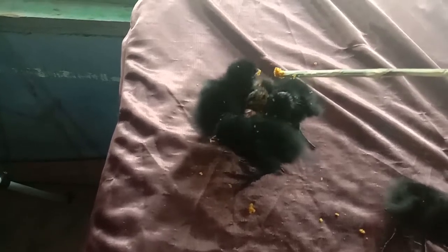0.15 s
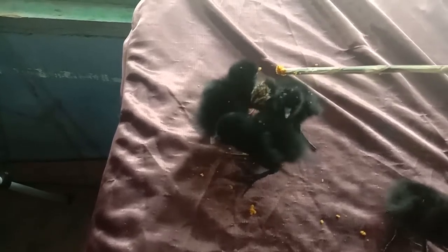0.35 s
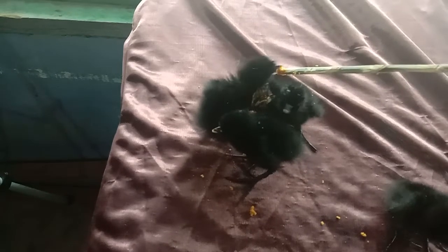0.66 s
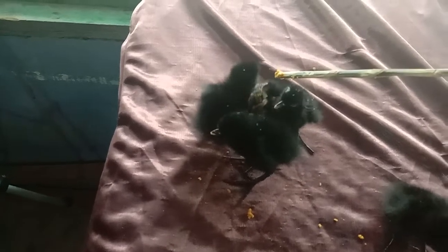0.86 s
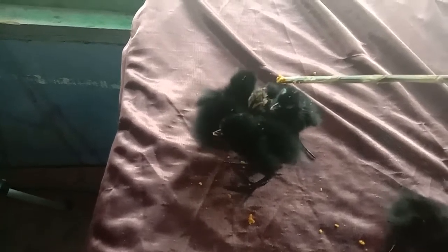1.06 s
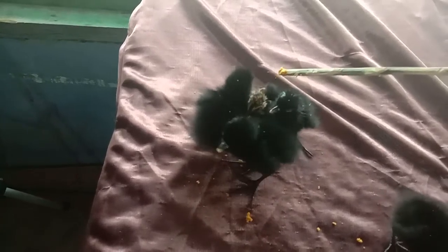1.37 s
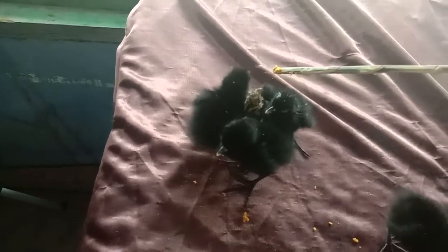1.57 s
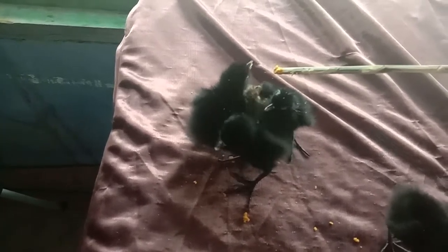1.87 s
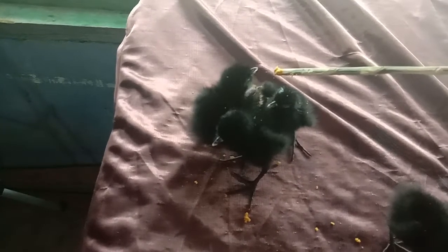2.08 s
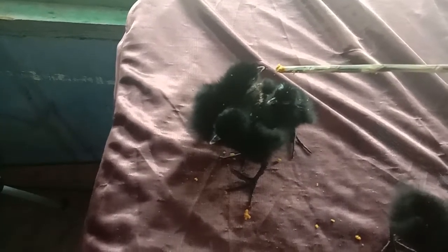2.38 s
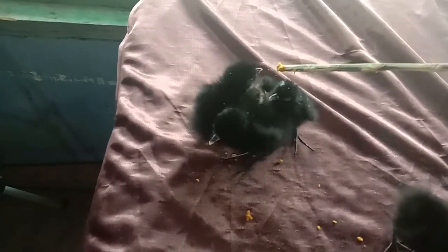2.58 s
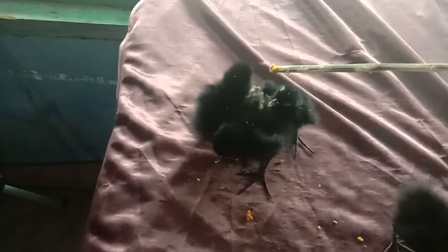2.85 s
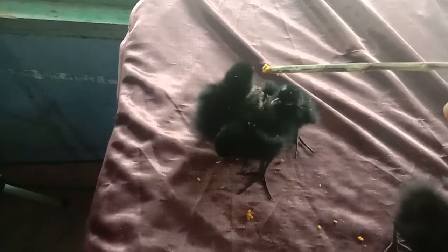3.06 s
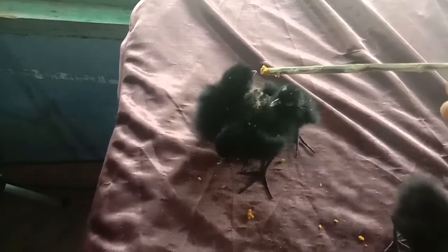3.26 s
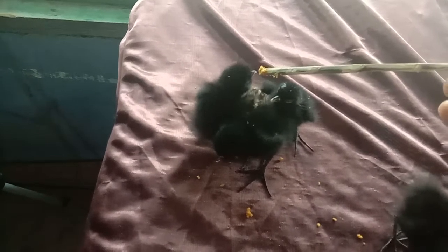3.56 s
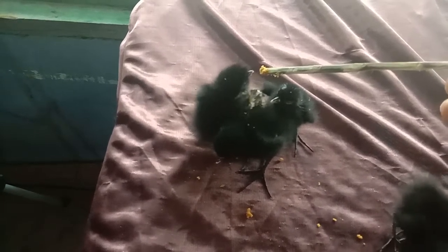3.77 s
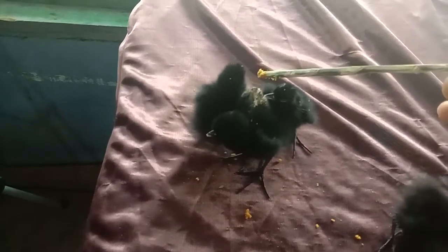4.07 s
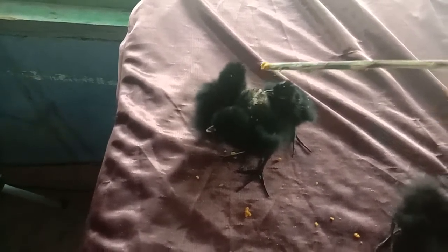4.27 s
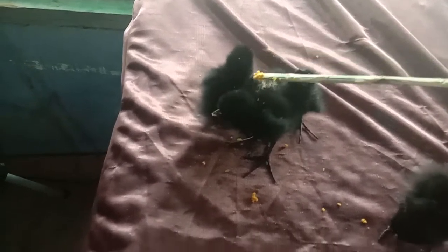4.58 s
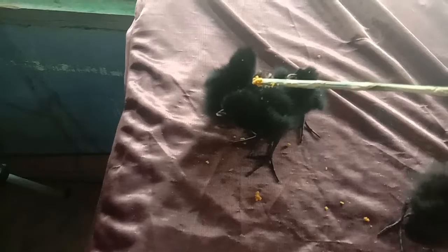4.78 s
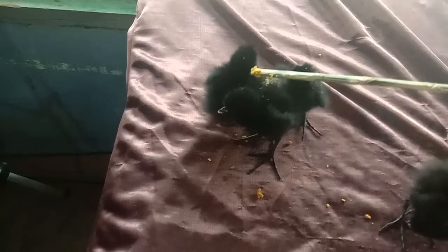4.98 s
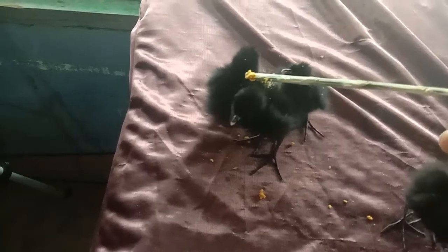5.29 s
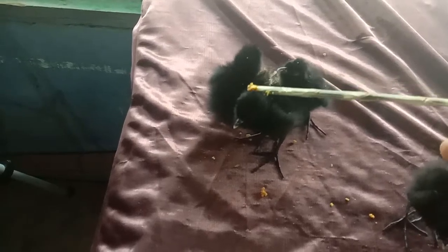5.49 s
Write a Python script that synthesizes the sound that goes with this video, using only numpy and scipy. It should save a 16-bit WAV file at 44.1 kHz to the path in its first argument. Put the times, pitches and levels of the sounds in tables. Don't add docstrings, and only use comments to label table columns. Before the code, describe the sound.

In a small shed, one hatchling near a phone cheeps piercingly, opening mid-peep, pausing, then calling again singly and in clusters until a loud last peep. Distant chicks flicker faintly, cloth rustles lightly, and a neighbouring machine throbs and rattles unevenly. One soft dove coo and a brief low rumble appear late, amid watery, noise-reduced hiss.

```python
import sys
import numpy as np
from scipy import signal
from scipy.io import wavfile
from scipy.ndimage import uniform_filter1d

SR = 44100
rng = np.random.default_rng(int(sys.argv[2]) if len(sys.argv) > 2 else 0)


def to_wav(sig):
    pcm = np.clip(np.atleast_2d(sig), -1, 1) * 32767
    pcm = np.round(pcm).astype(np.int16)
    wavfile.write(sys.argv[1], SR, pcm.T)


def makeup_ratio(level_db):
    decades = np.asarray(level_db, float) / 20
    return 10 ** decades


N = 248724


def svf(x, hz, width):
    return signal.lfilter(*signal.iirpeak(hz, hz / width, SR), x)


def narrow_noise(hz, width):
    return svf(svf(rng.standard_normal(N), hz, width), hz, width)


def unit(x):
    return x / np.sqrt(np.mean(x ** 2))


def walk(rate):
    k = int(SR / rate)
    levels = np.clip(rng.standard_normal(N // k + 1), -2.2, 1.6)
    held = np.repeat(levels, k)
    return 1.4 * uniform_filter1d(uniform_filter1d(held, k), k)[:N]


def span(table, fade=.006):
    s, *columns = np.transpose(table)
    i = np.arange(max(int(s[0] * SR), 0), min(int(s[-1] * SR), N))
    from_start = i - i[0] + (i[0] == 0) * N
    to_end = i[-1] - i + (i[-1] >= N - 2) * N
    ends = np.clip(np.minimum(from_start, to_end) / (fade * SR), 0, 1)
    smooth = (uniform_filter1d(np.interp(i / SR, s, c), size=130, mode="nearest") for c in columns)
    return i, ends * np.sqrt(2), *smooth


def hiss():
    # (frequency [Hz], level [dB per Hz])
    colour = [(18, -48), (30, -43), (95, 0.5), (392, -16.5), (735, -20), (955, -74), (1240, -7), (1610, -9),
              (1790, -16.5), (2460, -14.5), (3640, -10.5), (4370, -20.5), (9110, -21.5), (15800, -71)]
    hz_points, db_points = np.transpose(colour)
    out = 0
    for hz in 35 * 2 ** np.arange(0, 8.9, 1 / 3):
        db = np.interp(np.log(hz), np.log(hz_points), db_points) + 2.0 * walk(19)
        out = out + makeup_ratio(db) * narrow_noise(hz, hz / 3)
    out = out / np.sqrt(np.mean(svf(out, 8830, 733) ** 2))
    return out + makeup_ratio(7) * unit(narrow_noise(19000, 2200))


def rumble():
    start_s, rise_s, hold_s, fall_s = 4.98, 0.11, 0.14, 0.28
    turns = start_s + np.cumsum([0, rise_s, hold_s, fall_s])
    shape = np.interp(np.arange(N) / SR, turns, [0, 1, 1, 0])
    floor = sum(makeup_ratio(db) * unit(narrow_noise(hz, width))
                for db, hz, width in ((-46, 137.4, 18), (-49.5, 222, 65)))
    return shape * floor


def housing():
    # (frequency [Hz], width [Hz], level [dB])
    panels = [(96.6, 12.4, -1), (601.4, 100, -1), (680.5, 34, -1.5), (751.5, 10.2, 0), (875, 47, -6),
              (1053, 16, -8), (1240, 196, 3), (1464, 10.4, -4.5), (1823, 120, -5), (2077, 9.7, -9.5)]
    out = 0
    for hz, width, db in panels:
        out = out + makeup_ratio(db + 3.0 * walk(14)) * unit(narrow_noise(hz, 0.99 * width))
    return unit(out)


def strokes(events, rise, rough):
    out, t = np.zeros(N + SR), np.arange(int(.3 * SR)) / SR
    shape = t / rise * np.exp(1 - t / rise)
    for s, db, hz in events:
        wobble = np.cumsum(rng.standard_normal(len(t))) * rough
        start = int(s * SR)
        out[start:start + len(t)] += makeup_ratio(db) * shape ** 2 * np.sin(2 * np.pi * hz * t + wobble)
    return out[:N]


def machine_blows():
    # (time [s], peak level [dB], pitch [Hz])
    throbs = [(0.145, -50, 90), (0.237, -42.5, 91.5), (0.481, -45, 94), (0.717, -44, 94),
              (0.967, -45, 94.5), (1.325, -52, 94.2), (1.82, -49, 97), (1.933, -49, 98), (2.052, -50, 102),
              (2.221, -43.5, 101), (2.599, -54, 98), (2.771, -40, 96), (3.011, -46.5, 97), (3.257, -47, 98),
              (3.514, -43, 106), (3.867, -40, 96), (4.11, -40, 104), (4.341, -44, 100), (4.478, -43, 103),
              (4.586, -39.5, 93.7), (5.056, -47, 107), (5.169, -41, 125), (5.408, -45, 108),
              (5.526, -43, 89)]
    # (time [s], peak level [dB], pitch [Hz])
    knocks = [(0.218, -44, 594), (0.468, -45.5, 594), (0.579, -45, 626), (0.949, -38.5, 607),
              (1.036, -49, 775), (1.148, -46, 587), (1.22, -43, 595), (1.278, -40.5, 898),
              (1.421, -46, 592), (1.677, -47, 584), (1.85, -43, 749.5), (1.94, -38, 609), (1.995, -39, 736),
              (0.53, -41, 529), (2.251, -49.5, 582), (2.358, -53, 712), (2.441, -41, 763),
              (2.669, -42.5, 730), (2.886, -46, 614), (3.423, -41, 627), (3.606, -45, 759),
              (3.867, -42, 618), (4.023, -44.5, 745), (4.138, -42.5, 595), (4.214, -46, 743),
              (4.41, -46.5, 651), (4.502, -44, 767), (4.73, -42, 632), (4.802, -36.5, 596),
              (5.05, -42.5, 692)]
    # (time [s], peak level [dB], pitch [Hz])
    rattles = [(0.1378, -45, 1330), (0.277, -43, 1340), (1.1974, -36, 1315), (1.3831, -42, 1140),
               (1.6775, -39.5, 1193), (1.8289, -37.5, 1175), (2.0443, -49, 1290), (2.391, -42, 1506),
               (2.563, -44.5, 1844), (2.8935, -47, 1380), (2.9792, -41.5, 1063), (3.578, -37, 1515),
               (4.003, -37.5, 1258), (4.2413, -40, 1436), (4.3535, -40, 1397), (4.5514, -45, 1094),
               (4.914, -42.5, 1270), (5.08, -41.5, 1413), (5.2753, -42, 1816), (5.3936, -40, 1053),
               (5.5414, -51, 1895), (5.6092, -39, 1384)]
    return strokes(throbs, 0.016, 0.0027) + strokes(knocks, 0.017, 0.045) + strokes(rattles, 0.011, 0.075)


def dove():
    # (time [s], level [dB])
    coo = [
        (4.547, -40.5),
        (4.674, -46.5),
        (4.765, -51),
        (4.86, -57.5),
    ]
    swell_s, settled_hz, onset_hz, sag_s = .035, 352.5, 33.4, 0.0516
    t = np.arange(N) / SR
    first_s = coo[0][0]
    loudness = sum(makeup_ratio(db) * np.exp(-((t - s) / swell_s) ** 2) for s, db in coo)
    hz = settled_hz + onset_hz * np.exp(-np.clip(t - first_s + swell_s, 0, None) / sag_s)
    phase = 2 * np.pi * np.cumsum(hz) / SR
    third = makeup_ratio(-41) * np.exp(-((t - first_s - .022) / 0.02) ** 2)
    voice = loudness * (np.sin(phase) + makeup_ratio(-15) * np.sin(2 * phase))
    return np.sqrt(2) * (voice + third * np.sin(3 * phase))


def far_chicks():
    # (start [s], length [s], first pitch [Hz], last pitch [Hz], level [dB])
    nervous = [(0.082, 0.13, 3650, 4160, -50.5), (0.207, 0.1, 4080, 3570, -51),
               (0.902, 0.11, 3815, 4006, -46.5), (1.058, 0.1, 3884, 3510, -52),
               (1.134, 0.059, 3644, 3460, -41.5), (1.231, 0.059, 3820, 3890, -47),
               (1.66, 0.14, 3600, 3510, -50.5), (1.765, 0.067, 3950, 3316, -42),
               (1.829, 0.13, 3316, 2846, -53), (2.505, 0.13, 3620, 3660, -49),
               (2.921, 0.022, 3750, 3720, -40.5), (3.038, 0.19, 3620, 3685, -48.5),
               (3.37, 0.016, 3600, 3770, -55.5), (3.471, 0.064, 3660, 3703, -49.5),
               (4.002, 0.064, 3600, 3620, -48.5), (5.004, 0.038, 3730, 3850, -56),
               (5.146, 0.028, 3690, 3670, -47.5), (1.128, 0.034, 4400, 3450, -46),
               (0.865, 0.071, 3320, 3670, -54)]
    # (start [s], length [s], first pitch [Hz], last pitch [Hz], level [dB])
    calm = [(3.6, 0.31, 2600, 4010, -56.5), (4.37, 0.2, 2960, 3210, -53), (4.38, 0.23, 3720, 3610, -55),
            (5.39, 0.49, 3705, 3770, -54), (5.511, 0.179, 2985, 3340, -52), (1.32, 0.11, 3800, 3740, -62)]
    swell_share, ends_db = 0.1, 2.5
    out, shake, flutter = np.zeros(N), walk(120), walk(50)
    for nerves, whistles in ((1, nervous), (.25, calm)):
        for s, length, first_hz, last_hz, peak_db in whistles:
            bend_hz = first_hz + swell_share * (last_hz - first_hz)
            glide = [(s, first_hz, peak_db + ends_db),
                     (s + swell_share * length, bend_hz, peak_db),
                     (s + length, last_hz, peak_db + ends_db)]
            i, ends, hz, db = span(glide, fade=0.0045)
            flicker = makeup_ratio(db + nerves * (2.5 * flutter[i] + 3 * shake[::-1][i]) - 1)
            tremble = 1 + nerves * (0.0078 * shake[i] + 0.0039 * flutter[::-1][i])
            out[i] += ends * flicker * np.sin(2 * np.pi * np.cumsum(hz * tremble) / SR)
    return out


def rustles():
    # (time [s], peak level [dB], length [s])
    scuffs = [(0.74, -52, 0.091), (1.16, -52, 0.029), (1.317, -47, 0.012), (1.823, -71, 0.12),
              (2.017, -49.5, 0.029), (2.121, -46, 0.021), (2.497, -47.5, 0.082), (3.03, -53, 0.064),
              (3.057, -56, 0.12), (3.234, -46.5, 0.063), (3.455, -52, 0.039), (3.774, -48.5, 0.12),
              (4.657, -45.5, 0.13), (4.937, -55, 0.12), (5.077, -44, 0.021), (5.554, -60, 0.096)]
    gate, t = np.zeros(N), np.arange(N) / SR
    for s, db, length in scuffs:
        fall = np.exp(-(np.clip(t - s, 0, None) / np.clip(length, .01, .09)) ** 2)
        gate += makeup_ratio(db) * (t > s) * fall
    noise = rng.standard_normal(N) * makeup_ratio(1.0 * walk(330))
    cloth = unit(svf(noise, 3640, 4500) + makeup_ratio(-30) * svf(noise, 19000, 3000))
    return uniform_filter1d(gate, size=300) * makeup_ratio(-3.5) * cloth


def chicks():
    # (time [s], pitch [Hz], level [dB], octave level [dB])
    early = [
        [(0.0, 4310, -24.5, -49), (0.006, 4210, -31.5, -45), (0.028, 4230, -29, -38), (0.056, 3880, -28, -36),
         (0.074, 3550, -25, -34), (0.084, 3201, -30.5, -38.5), (0.098, 2580, -57, -42)],
        [(0.303, 2955, -49, -62), (0.315, 3596, -32, -61), (0.325, 4216, -33, -48), (0.347, 5100, -25.5, -36),
         (0.359, 5315, -20, -65), (0.363, 5430, -21.5, -46), (0.393, 4690, -31, -58)],
        [(0.39, 4770, -19, -58), (0.408, 4952, -18.5, -55), (0.428, 5000, -21.5, -52), (0.44, 4920, -25, -57),
         (0.46, 4580, -26, -64), (0.512, 4504, -32, -63), (0.522, 4410, -33, -74), (0.53, 4240, -31, -56),
         (0.548, 4100, -40, -60)],
        [(0.55, 2946, -49, -48), (0.584, 4040, -30.5, -51), (0.6, 4300, -34.5, -66), (0.624, 4060, -29.5, -55),
         (0.666, 4010, -29, -38.5), (0.746, 3480, -33, -38.5), (0.76, 3256, -41, -35),
         (0.836, 3010, -49, -49.5), (0.854, 2500, -59, -56)],
    ]
    # (time [s], pitch [Hz], level [dB], octave level [dB])
    middle = [
        [(1.385, 2620, -62, -60), (1.393, 2760, -46, -44.5), (1.433, 4370, -26, -30.5), (1.439, 4970, -18, -35),
         (1.447, 5300, -22, -48), (1.457, 5305, -17.5, -36.5), (1.519, 4250, -23, -34.5),
         (1.595, 3510, -36, -40), (1.611, 3250, -41, -51)],
        [(2.265, 2300, -71, -52), (2.285, 3220, -34.5, -67), (2.315, 4510, -29, -54), (2.325, 4590, -24, -53),
         (2.349, 4380, -27.5, -31.5), (2.413, 4000, -23, -36), (2.439, 3434, -30, -42), (2.447, 3130, -38, -41),
         (2.457, 2500, -56, -33)],
        [(2.595, 2640, -52, -46), (2.607, 2844, -40.5, -34), (2.661, 5160, -19, -32.5), (2.699, 4480, -26, -23),
         (2.747, 4074, -28, -41), (2.791, 3726, -38, -39), (2.811, 3810, -36, -37), (2.819, 3700, -40, -52),
         (2.839, 2680, -59, -42)],
        [(3.02, 2915, -45, -75), (3.044, 3640, -36, -72), (3.078, 4590, -39, -75), (3.128, 4360, -35, -67),
         (3.138, 4547, -35.5, -62), (3.186, 4390, -31, -74), (3.208, 4141, -33, -59), (3.218, 3830, -33, -56),
         (3.238, 2720, -49, -47)],
    ]
    # (time [s], pitch [Hz], level [dB], octave level [dB])
    late = [
        [(3.863, 2648, -54, -43), (3.893, 3530, -51, -41), (3.931, 5270, -20.5, -34),
         (3.965, 4780, -24.5, -32.5), (4.031, 4390, -37, -34.5), (4.079, 4050, -35, -50),
         (4.101, 4080, -37, -44), (4.113, 3660, -29, -41), (4.125, 2900, -46, -54)],
        [(4.155, 2320, -52, -62), (4.167, 2580, -60, -60), (4.181, 3229, -39.5, -55), (4.211, 4386, -30.5, -49),
         (4.243, 4144, -31, -54), (4.337, 3626, -36.5, -41.5), (4.349, 3416, -32, -39), (4.361, 3179, -45, -48),
         (4.379, 2444, -71, -66)],
        [(4.498, 2350, -70, -47), (4.52, 3456, -38, -48.5), (4.534, 4127, -34, -57), (4.548, 4650, -29, -48),
         (4.562, 4690, -26, -65), (4.602, 4365, -30.5, -48.5), (4.704, 3660, -34, -44), (4.726, 3130, -44, -43),
         (4.736, 2670, -66, -44)],
        [(5.148, 2600, -64, -54), (5.158, 2914, -48.5, -36), (5.212, 5220, -18, -39),
         (5.268, 4460, -21.5, -28.5), (5.294, 4340, -24, -31.5), (5.328, 3940, -26.5, -48),
         (5.348, 3650, -37, -38.5), (5.378, 2930, -40, -40), (5.394, 2370, -71, -38)],
    ]
    # (time [s], pitch [Hz], level [dB], octave level [dB])
    mate = [
        [(0.29, 2610, -57, -49), (0.296, 2746, -47, -35), (0.314, 2853, -44, -41.5), (0.37, 4626, -34.5, -32),
         (0.398, 4750, -26, -44), (0.408, 4630, -34, -49), (0.424, 4370, -26.5, -40.5), (0.484, 3815, -26, -45),
         (0.542, 3604, -35.5, -51)],
        [(4.068, 2332, -70, -56), (4.082, 2942, -41, -63), (4.092, 3334, -35.5, -47), (4.124, 4157, -29, -37),
         (4.142, 4651, -35, -54), (4.156, 4844, -28.5, -55), (4.214, 4317, -39.5, -38), (4.298, 3735, -31, -41),
         (4.326, 3111, -57, -63)],
    ]
    # (warble depth [dB], warble pitch [share of the whistle],
    # upper overtones against the octave [dB])
    voices = [(-46, 0.15, -13), (-30, .2, -8), (-20, 0.2, -22), (-47, 0.16, -13.5), (-25.5, 0.18, -18),
              (-23, .23, -20), (-21.5, .2, -18.5), (-28, .2, -25), (-35, 0.057, -15), (-40, 0.29, -6),
              (-28, 0.2, -26), (-51, 0.22, -12), (-40, 0.11, -11.5), (-37, 0.45, -5)]
    # (time [s], pitch jump [Hz], level jump [dB], length [s])
    catches = [(0.675, 96, 1, 0.0098), (0.701, -92, -1, 0.012), (0.785, -85, -0.5, 0.026),
               (.825, 103, 4.5, 0.021), (1.469, 112, 1.5, .01), (1.495, -170, -4, 0.011),
               (2.632, -150, -3.5, 0.011), (2.648, 130, -2.5, 0.0087), (2.674, 148, 3, 0.008),
               (2.691, -150, -3, 0.0071), (3.062, -150, 0, 0.0057), (3.193, 16, -6, .003),
               (0.457, 12, -6, .006), (0.431, 105, 0, 0.0074), (5.318, -61, 0, .008),
               (3.936, 76, -5, 0.0024), (3.978, 10, -6, .003), (4.641, 100, -1.5, 0.015),
               (4.661, -90, 4, .01), (5.187, -170, -2.5, 0.00965), (5.199, 137, 3, 0.005),
               (5.225, 85, 2, 0.013), (5.259, -85, -3.5, 0.0061)]
    # (time [s], length [s], level [dB])
    halves = [(0.015, 0.025, -43), (1.415, 0.011, -50), (2.34, 0.011, -42), (2.61, 0.015, -40.5),
              (3.9, 0.014, -47), (4.243, .02, -53), (5.175, 0.008, -44)]
    hoarse_db_per_khz = 12

    out, shake, flutter, breaks = np.zeros(N), walk(76), walk(90), walk(40)
    shake_back, breaks_back = shake[::-1], breaks[::-1]
    soft = signal.butter(3, 1300, fs=SR, output="sos")
    air = unit(signal.sosfilt(soft, rng.standard_normal(N)))
    breath = air * makeup_ratio(4.5 * breaks)
    quiver = np.clip(unit(svf(air, 130, 180)), -2.5, 1.2)
    quiver_back = quiver[::-1]

    near_glides = early + middle + late
    for number, (glide, voice) in enumerate(zip(near_glides + mate, voices)):
        warble_db, share, upper_db = voice
        i, ends, hz, db, octave_db = span(glide)
        near = number < len(near_glides)
        for s, jump_hz, jump_db, length in catches * near:
            catch = np.exp(-((i / SR - s) / length) ** 2)
            hz, db = hz + jump_hz * catch, db + jump_db * catch
        tremble = 1 + .008 * shake[i] + .003 * quiver_back[i]
        phase = 2 * np.pi * np.cumsum(hz * tremble) / SR

        octave_now_db = octave_db - 1.5 + 2.5 * breaks[i] + 4 * shake_back[i] + 2 * quiver_back[i]
        tone = makeup_ratio(db) * np.sin(phase) + makeup_ratio(octave_now_db) * np.sin(2 * phase)
        for k, drop_db in zip((3, 4, 5), (-3, -14, -20)):
            dull_db = -3.0 * np.clip(k * hz / 1000 - 11, 0, None)
            upper_now_db = octave_db + upper_db + drop_db + dull_db + 6 * breaks_back[i] + 3 * shake[i]
            tone += makeup_ratio(upper_now_db) * np.sin(k * phase) * (k * hz < .45 * SR)

        half = sum(makeup_ratio(half_db) * np.exp(-((i / SR - s) / length) ** 2) for s, length, half_db in halves)
        between = makeup_ratio(-10) * np.sin(phase / 2) + np.sin(3 * phase / 2) + makeup_ratio(-6) * np.sin(5 * phase / 2)
        tone += half * near * between

        sagging = np.clip((i - i[np.argmax(hz)]) / SR / 0.027 - .6, 0, 1)
        depth = 2 * makeup_ratio(min(warble_db, -6) + 4 * shake[i])
        warble = 1 + depth * sagging * np.sin(share * phase + 4 * flutter[i])
        tone *= makeup_ratio(1.2 * flutter[i] + 1.3 * quiver[i])
        leak_db = -30 - .3 * (db + 25) - hoarse_db_per_khz * (hz / 1000 - 4)
        out[i] += ends * tone * (warble + makeup_ratio(leak_db) * breath[i])
    return out


def shed(x):
    t60_s = .2
    t = np.arange(int(.4 * SR)) / SR
    tail = rng.standard_normal(len(t)) * np.exp(-np.log(1000) * t / t60_s) * (t > .012)
    tail = tail / np.sqrt(np.sum(tail ** 2))
    tail = signal.sosfilt(signal.butter(2, 6500, fs=SR, output="sos"), tail) * 1.6
    return signal.fftconvolve(x, tail)[:N]


def patches(shape, bins, frames):
    coarse = rng.standard_normal((shape[0] // bins + 1, shape[1] // frames + 1))
    field = np.repeat(np.repeat(coarse, bins, axis=0), frames, axis=1)[:shape[0], :shape[1]]
    return np.clip(unit(uniform_filter1d(field, size=3, axis=0)), -2.5, 1.6)


def denoise(x, fine_db=5.5, wide_db=3.5, stripe_db=2.0):
    cells = signal.stft(x, nperseg=1024)[2]
    fine, wide, stripe = (patches(cells.shape, *size) for size in ((3, 4), (36, 3), (600, 2)))
    above_bass = np.clip(np.arange(len(cells))[:, None] / 30, 0, 1)
    gain_db = fine_db * fine + above_bass * (wide_db * wide + stripe_db * stripe)
    return signal.istft(cells * makeup_ratio(gain_db), nperseg=1024)[1][:N]


def scene():
    # (time [s], level [dB])
    load = [(0, -47), (.3, -51), (.55, -42.5), (.93, -49.5), (1.0, -39.5), (1.13, -53), (1.23, -42),
            (2.03, -44.5), (2.2, -52.5), (2.29, -42.5), (3.1, -49), (3.4, -54), (3.57, -43), (4.1, -48.5),
            (4.75, -43), (4.88, -50.5), (5.05, -43.5), (5.64, -45)]
    duck_above_db, duck_s = -26, .04
    no_bass = signal.butter(4, 1200, "high", fs=SR, output="sos")
    near, far = signal.sosfilt(no_bass, chicks()), far_chicks()
    birds = near + far + shed(makeup_ratio(-17) * near + makeup_ratio(-7.5) * far)

    loud_db = 10 * np.log10(uniform_filter1d(near ** 2, size=int(duck_s * SR)).clip(1e-9))
    over_db = np.clip(loud_db - duck_above_db, 0, None)
    load_db = np.interp(np.arange(N) / SR, *np.transpose(load))
    running = makeup_ratio(load_db - 6.0 - 1.16 * over_db) * housing()

    air = hiss()
    low = signal.sosfilt(signal.butter(2, 900, fs=SR, output="sos"), air)
    treble_db = -70.5 - 0.81 * over_db + 0.15 * (load_db - load_db.mean())
    air = makeup_ratio(-70.5) * low + makeup_ratio(treble_db) * (air - low)
    background = denoise(running + rustles() + air)
    return (birds + machine_blows() + dove() + rumble() + background)[None]


def top_cut(x):
    return signal.sosfilt(signal.butter(12, 15950, fs=SR, output="sos"), x)


def record(dry):
    top = signal.sosfilt(signal.ellip(8, .2, 50, 15700, fs=SR, output="sos"), dry)
    return top_cut(top)


dry = scene()
out = record(dry)
to_wav(out)
```